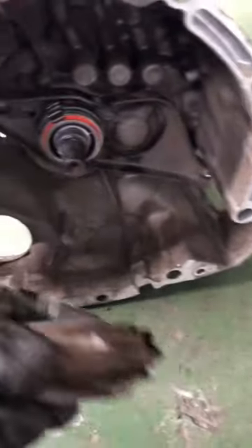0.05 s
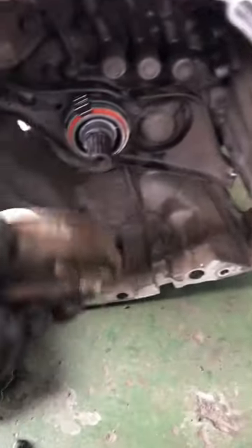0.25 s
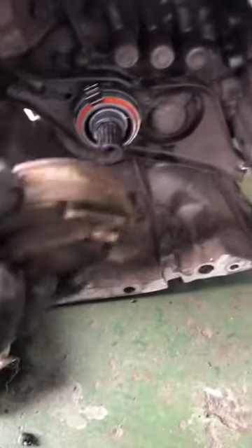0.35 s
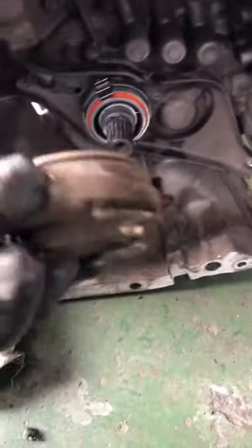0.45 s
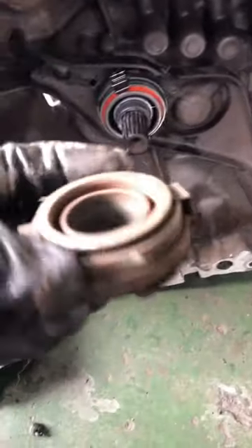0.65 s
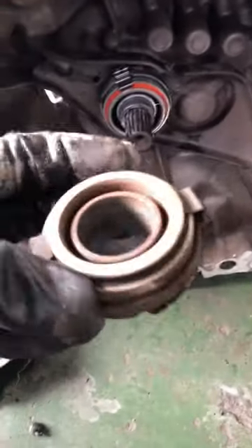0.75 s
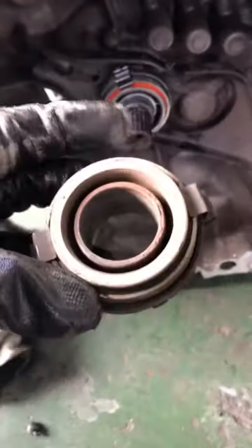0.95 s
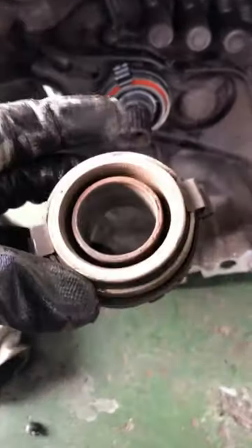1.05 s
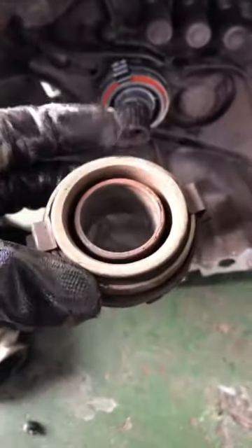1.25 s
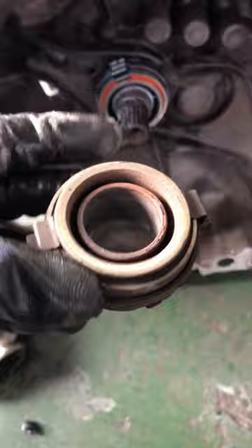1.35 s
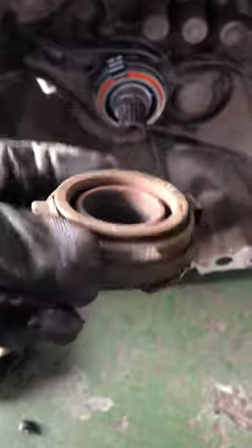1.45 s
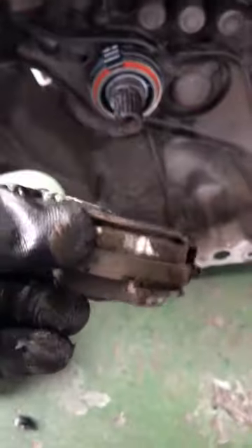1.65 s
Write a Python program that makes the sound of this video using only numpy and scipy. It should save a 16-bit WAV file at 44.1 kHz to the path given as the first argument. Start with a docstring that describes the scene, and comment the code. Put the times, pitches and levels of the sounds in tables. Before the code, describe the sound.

One brief hammering burst from an air impact wrench, then a faint metal clink.

```python
"""In an echoing workshop, an air impact wrench gives one short, loud rattle.
Air swells as its motor spins up, then its hammer strikes eleven times, settling near thirty blows
a second. Each blow clangs the steel and keeps the socket ringing, and the hall rings on.
Afterwards come a faint hiss, a small scrape and a clink of metal. A machine hums low throughout."""
import sys
import numpy as np
from scipy import signal
from scipy.fft import rfft, irfft
from scipy.io import wavfile

SR = 44100
rng = np.random.default_rng(int(sys.argv[2]) if len(sys.argv) > 2 else 0)


def log_audio(samples):
    """Write samples as a 16-bit WAV file to the path given in sys.argv[1]."""
    # one column per channel
    frames = np.atleast_2d(samples).T
    # limit to full scale, then quantise
    limited = np.clip(frames, -1, 1)
    pcm = np.round(limited * 32767).astype(np.int16)
    wavfile.write(sys.argv[1], SR, pcm)


N = 74970  # 1.7 seconds

# tone colour of the workshop air (frequency [Hz], relative level [dB])
ROOM_COLOUR = [(45, -12), (75, -9.5), (140, -15), (190, -11), (260, -16), (420, -23.5), (900, -20.5),
               (1750, -25), (3000, -24.5), (4300, -30), (6000, -38.5), (10000, -44.5), (16000, -46)]
# steady tones of a distant machine (pitch [Hz], level [dB])
HUM_TONES = [(33, -52), (198, -64.5), (344.5, -62.5)]
# small metal contacts (start [s], hold [s], decay [s], knock level [dB], scrape level [dB])
CONTACTS = [(0.0, 0.008, 0.027, -47, -53), (1.286, 0.014, 0.03, -46, -57), (1.312, .01, 0.02, -46.5, -50.5),
            (1.402, 0.0087, 0.0026, -44, -49), (1.412, 0.0052, 0.02, -35.5, -50)]
# tone colour of a knock (frequency [Hz], relative level [dB])
KNOCK_COLOUR = [(400, -29.5), (1000, -22), (1500, 0.5), (1720, -19), (2000, 3.5), (2400, -8.5), (3000, -10),
                (3690, -12.5), (4400, -23), (8000, -24), (16000, -46)]
# tone colour of a scrape (frequency [Hz], relative level [dB])
SCRAPE_COLOUR = [(2000, -30), (3000, -7), (4500, -9), (5100, -2.5), (5600, 0), (6300, -6.5), (7100, -8),
                 (8500, -23.5), (16000, -29)]
# light tings of metal (start [s], pitch [Hz], time to fade 60 dB [s], level [dB])
METAL_TINGS = [(1.288, 3670, 0.1, -40.5), (1.315, 3670, 0.17, -47), (1.317, 5480, 0.073, -40),
               (1.405, 2375, 0.1, -36), (1.413, 2002, 0.16, -37.5), (1.412, 1492, .22, -36)]
# tone colour of the air leaving the motor (frequency [Hz], relative level [dB])
EXHAUST_COLOUR = [(200, -15.5), (700, -4), (1200, 8), (2000, 2), (4000, 3), (6000, -8.5), (8000, -6.5),
                  (10000, -15), (16000, -20)]
# hammer blows, with relative levels (start [s], clang [dB], clatter [dB], sizzle [dB])
HAMMER_BLOWS = [(0.22, -3.5, 3, 4.5), (0.283, 5, 2.5, 0), (0.324, 4, -1, 1.5), (0.362, 0, 1.5, 0.5),
                (0.396, -6.5, -7.5, 0), (0.43, 0.5, 1, 1.5), (0.464, 2.5, 0.5, -1.5), (0.496, -6, 3, 1),
                (0.531, -1.5, -7, 1.5), (0.562, -2, -18.5, 2), (0.595, -1.5, -3.5, 2)]
# tone colour of a blow's clatter (frequency [Hz], relative level [dB])
CLATTER_COLOUR = [(130, -28), (210, -10), (310, -9.5), (400, -5), (500, -16.5), (650, -4.5), (900, -9),
                  (1050, -6), (1230, 6), (1750, -6.5), (2150, -1), (2550, -5), (3200, -2), (4100, -1),
                  (5000, -8.5), (6500, -13), (9000, -41.5)]
# tone colour of a blow's high sizzle (frequency [Hz], relative level [dB])
SIZZLE_COLOUR = [(2500, -24), (5000, -1), (6800, 0), (8200, -2), (9400, 1), (10400, -3.5), (13500, 0),
                 (16000, -3.5)]
# short tones of the struck body (pitch [Hz], relative level [dB], time to fade 60 dB [s])
BODY_TONES = [(221, -20.5, 0.23), (391.3, -22, 0.21), (1107.4, -5.5, 0.1), (1164, -3.5, .05),
              (1198, -5.5, 0.063), (1452, 1.5, 0.068), (2140, -6.5, 0.054)]
# long tones of the steel socket (pitch [Hz], relative level [dB], time to fade 60 dB [s])
SOCKET_TONES = [(882, -18, 1.69), (1504, 2.5, .3), (1492.4, -2, 1.38), (2166, -14, 0.263),
                (2634, -13.5, .3), (2970, -4, 0.44), (3565, -13.5, .3), (3580, -20.5, 0.25),
                (3970, -13.5, .3), (4394, -11, 0.37)]
# the hall's echo, band by band (frequency [Hz], relative level [dB], time to fade 60 dB [s])
HALL_BANDS = [(150, 0, 0.35), (390, -2, 0.98), (890, -0.5, 1.77), (1170, -7.5, 1.74), (1700, -4, 2.04),
              (2600, -8.5, 1.67), (4500, -5, 1), (7500, -10.5, 0.59), (9000, -9, 0.45),
              (11500, -11.5, 0.32), (14500, -8.5, .22)]
# three faint hisses and, at 1.411 s, the bright splash of the metal clink
# (start [s], rise [s], hold [s], decay [s], level [dB])
TREBLE_BURSTS = [(1.14, 0.039, .05, 0.1, -54), (1.411, 0.0038, 0.008, .012, -41.5),
                 (1.484, .02, .06, .01, -74), (1.65, .03, .06, .03, -60.5)]
# tone colour of those bursts (frequency [Hz], relative level [dB])
BURST_COLOUR = [(1500, -9), (4000, 5), (7000, 3.5), (10000, -0.5), (15000, -10.5), (16000, -11)]

TIME = np.arange(N) / SR  # of each sample [s]
FREQS = np.arange(N // 2 + 1) * SR / N  # of each point in a spectrum [Hz]


def gain(db):
    """Turn decibels into a number to multiply by."""
    return 10 ** (np.asarray(db) / 20)


def normalise(x):
    """Scale a sound to an average (rms) level of 1."""
    return x / np.sqrt(np.mean(x ** 2))


def noise(colour):
    """Steady noise shaped by a tone colour table."""
    hz, db = np.array(colour).T
    freqs = np.maximum(FREQS, 1)
    shape = gain(np.interp(np.log(freqs), np.log(hz), db))
    bass_cut = np.minimum(freqs / hz[0], 1) ** 2
    return normalise(irfft(rfft(rng.standard_normal(N)) * shape * bass_cut, N))


def patchy(x, spread_db=3.5, width_hz=170):
    """Lift and dip frequencies at random: each contact makes the steel ring a little differently."""
    heights = rng.standard_normal(512)
    bumps_db = spread_db * np.interp(FREQS / width_hz, np.arange(len(heights)), heights)
    return normalise(irfft(rfft(x) * gain(bumps_db), N))


def envelope(start, rise, hold, decay):
    """Loudness over time: it rises, stays up until hold seconds after the start, then dies away."""
    age = TIME - start
    return np.clip(age / rise, 0, 1) * np.exp(-np.maximum(age - hold, 0) / decay)


def ring(tones, start, detune, rise_s=0.0012):
    """Metal struck once rings with fading tones, each slightly off pitch."""
    age, out = np.maximum(TIME - start, 0), 0
    for hz, db, fade_s in tones:
        pitch = hz * (1 + detune * rng.standard_normal())
        out += gain(db - 60 * age / fade_s) * np.sin(2 * np.pi * pitch * age)
    return np.minimum(age / rise_s, 1) * out


def background(air_db=-47.5):
    """The workshop air rumbles softly and a distant machine hums."""
    hum = sum(gain(db) * np.sqrt(2) * np.sin(2 * np.pi * (hz * TIME + rng.random()))
              for hz, db in HUM_TONES)
    return gain(air_db) * noise(ROOM_COLOUR) + hum


def handling():
    """Metal parts knock, scrape and ting as they touch."""
    knock, scrape = 0, 0
    for start, hold, decay, knock_db, scrape_db in CONTACTS:
        contact = envelope(start, 0.002, hold, decay)
        knock += gain(knock_db) * contact
        scrape += gain(scrape_db) * contact
    tings = sum(ring([(hz, db, fade_s)], start, detune=0.001) for start, hz, fade_s, db in METAL_TINGS)
    return knock * patchy(noise(KNOCK_COLOUR)) + scrape * patchy(noise(SCRAPE_COLOUR)) + tings


def exhaust(full_speed_s=0.23, release_s=0.646, level_db=-26.5):
    """Air swells as the motor spins up and dies away when the trigger is let go."""
    swell = np.exp(np.minimum(TIME - full_speed_s, 0) / 0.022)
    fade = np.exp(-np.maximum(TIME - release_s, 0) / 0.023)
    return gain(level_db) * swell * fade * noise(EXHAUST_COLOUR)


def hammer(clatter_base_db=-16, sizzle_base_db=-14.5):
    """Each blow is a few milliseconds of steel chattering on steel, with a colour of its own."""
    out, steel, treble = 0, noise(CLATTER_COLOUR), noise(SIZZLE_COLOUR)
    for start, _, clatter_db, sizzle_db in HAMMER_BLOWS:
        clatter = envelope(start, rise=0.0008, hold=0.0064, decay=0.0066) * patchy(steel)
        sizzle = envelope(start, rise=0.0017, hold=0.0061, decay=0.0049) * patchy(treble)
        out += gain(clatter_base_db + clatter_db) * clatter + gain(sizzle_base_db + sizzle_db) * sizzle
    return out


def clang(base_db=-15.5, scatter_s=0.00036):
    """The struck body answers every blow with a short clang."""
    out = 0
    for start, clang_db, _, _ in HAMMER_BLOWS:
        struck = start + scatter_s * rng.standard_normal()
        out += gain(base_db + clang_db) * ring(BODY_TONES, struck, detune=0.0014)
    return out


def socket(base_db=-28.5, scatter_db=5, kick_radians=0.91, drop_s=0.797, drop_db=-2):
    """The socket rings between the blows and after them; every blow tops up its tones."""
    starts, out = [blow[0] for blow in HAMMER_BLOWS], 0
    for hz, db, fade_s in SOCKET_TONES:
        strengths = gain(scatter_db * rng.standard_normal(len(starts)))
        energy = sum((strength * envelope(start, 0.004, 0.005, fade_s / np.log(1000))) ** 2
                     for start, strength in zip(starts, strengths))
        # each blow also nudges the wave a little early or late
        phase = sum(kick_radians * rng.standard_normal() * np.clip((TIME - start) / 0.012, 0, 1)
                    for start in starts)
        out += gain(base_db + db) * np.sqrt(energy) * np.sin(2 * np.pi * hz * TIME + phase)
    sudden_drop = gain(drop_db * np.clip((TIME - drop_s) / 0.004, 0, 1))
    return sudden_drop * out


def near_echoes(x, level_db=-5.5):
    """Sound bounces straight back from the car and floor close by."""
    echoes = rng.standard_normal(N) * envelope(start=0.01047, rise=0.00095, hold=0.0028, decay=0.01)
    return gain(level_db) * signal.fftconvolve(x, echoes / np.linalg.norm(echoes))[:N]


def hall(x, build_up_s=0.04):
    """Echoes blur together around the workshop; the middle pitches last longest."""
    log_hz, centres = np.log(np.maximum(FREQS, 1)), np.log([band[0] for band in HALL_BANDS])
    spectrum, echoes = rfft(rng.standard_normal(N)), 0
    for only_this_band, (_, db, fade_s) in zip(np.eye(len(HALL_BANDS)), HALL_BANDS):
        band = irfft(spectrum * np.interp(log_hz, centres, only_this_band), N)
        fade = np.minimum(TIME / build_up_s, 1) * gain(-60 * TIME / fade_s)
        echoes += gain(db) * band * fade / np.linalg.norm(fade)
    return signal.fftconvolve(x, echoes)[:N]


def hisses_and_clink():
    """Bursts of high noise make the faint hisses and the bright splash of the metal clink."""
    loudness = sum(gain(db) * envelope(*timing) for *timing, db in TREBLE_BURSTS)
    return loudness * noise(BURST_COLOUR)


def scene():
    """Mix the wrench, the small sounds, their echoes and the background."""
    rattle = hammer() + exhaust()
    body, parts = clang(), handling()
    direct = rattle + body + socket() + parts
    into_hall = rattle + gain(-8) * body + gain(-3) * parts
    return (direct + near_echoes(rattle) + hall(into_hall) + hisses_and_clink() + background())[None]


def record(dry):
    """Cut away the very highest treble, above 15900 Hz."""
    return signal.sosfilt(signal.ellip(10, 0.2, 70, 15900, fs=SR, output="sos"), dry)


dry = scene()
out = record(dry)
log_audio(out)
```